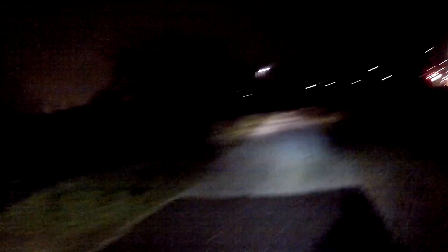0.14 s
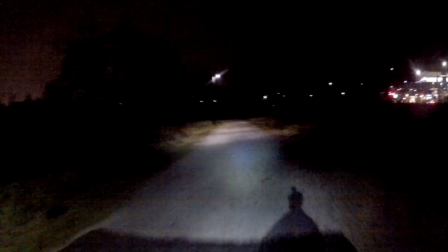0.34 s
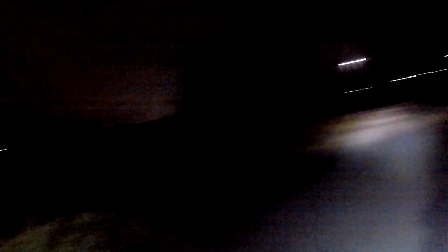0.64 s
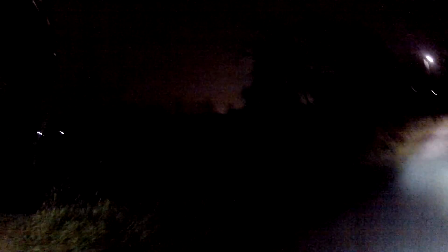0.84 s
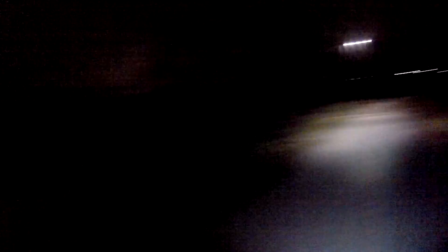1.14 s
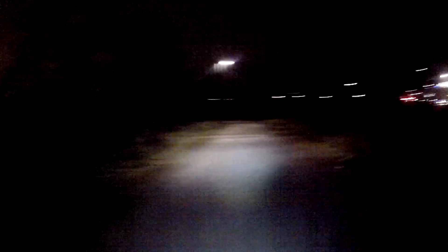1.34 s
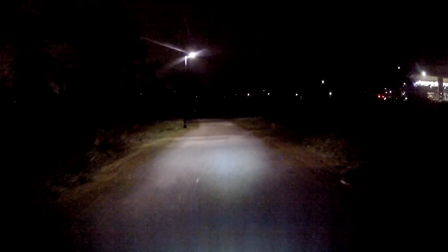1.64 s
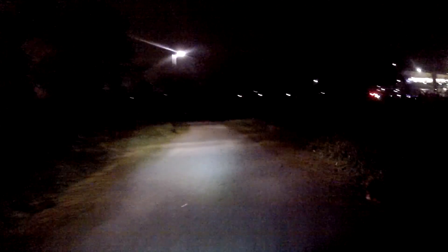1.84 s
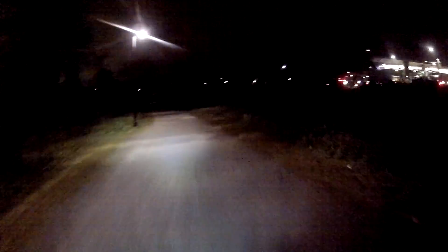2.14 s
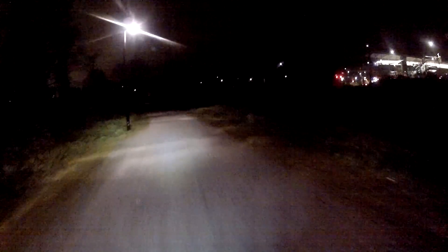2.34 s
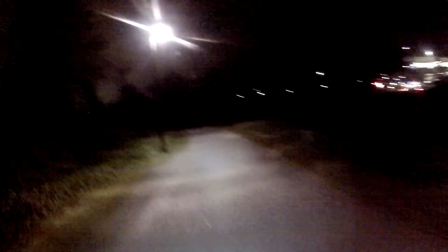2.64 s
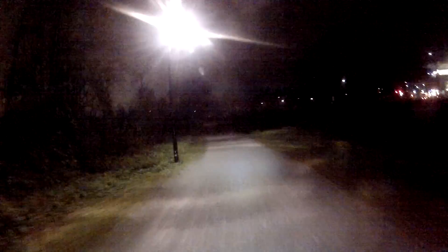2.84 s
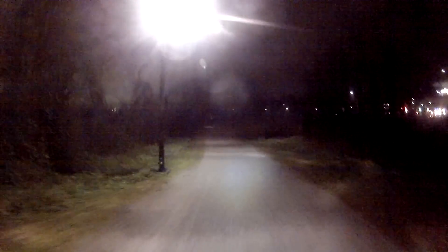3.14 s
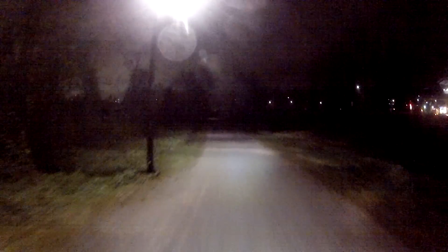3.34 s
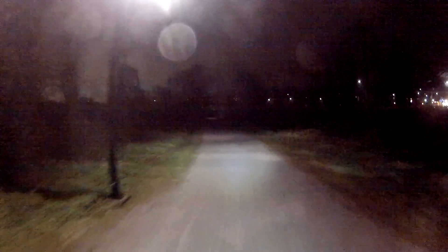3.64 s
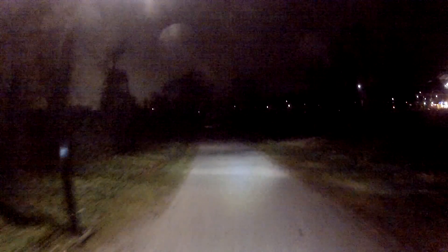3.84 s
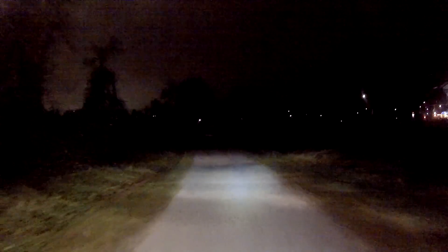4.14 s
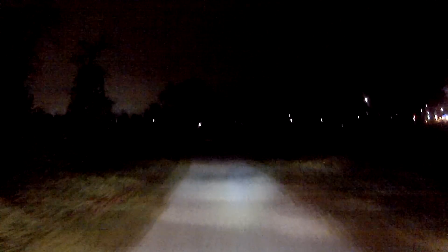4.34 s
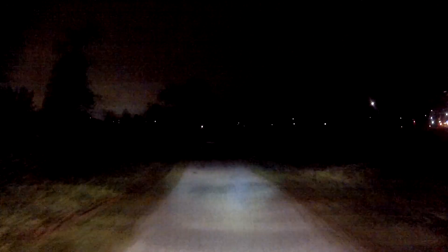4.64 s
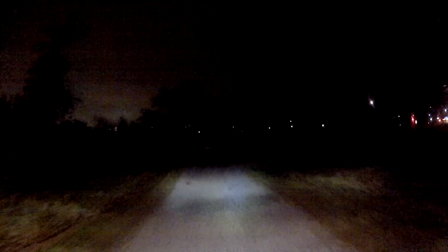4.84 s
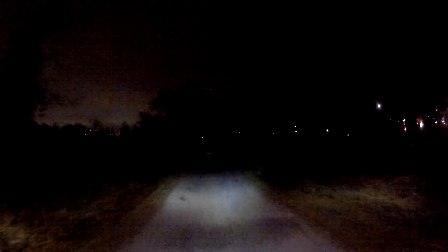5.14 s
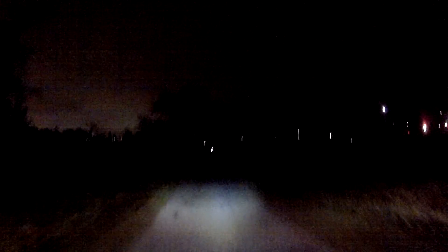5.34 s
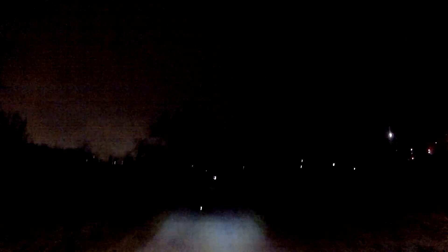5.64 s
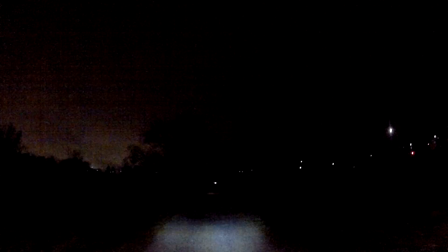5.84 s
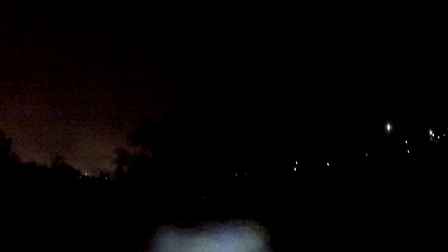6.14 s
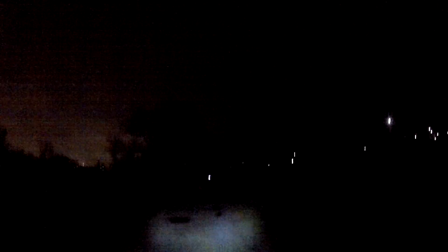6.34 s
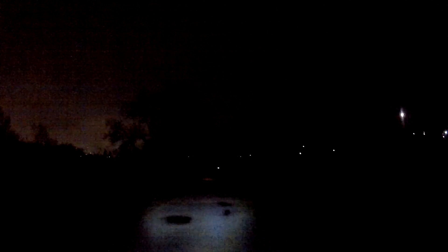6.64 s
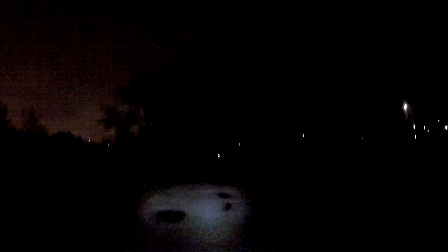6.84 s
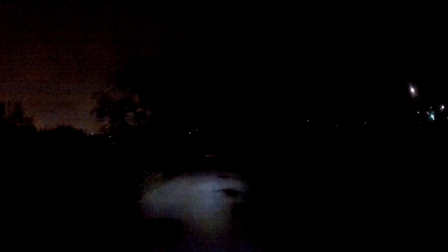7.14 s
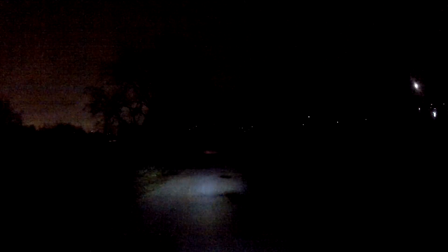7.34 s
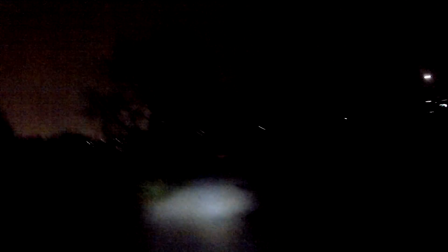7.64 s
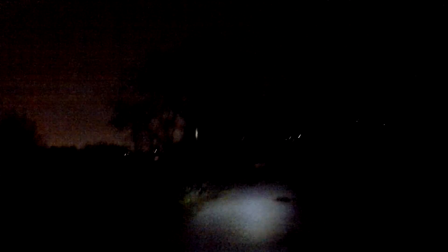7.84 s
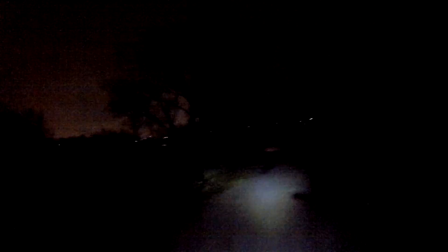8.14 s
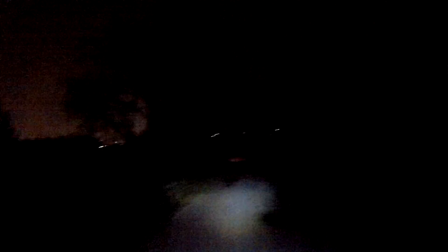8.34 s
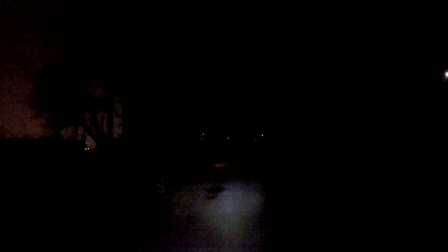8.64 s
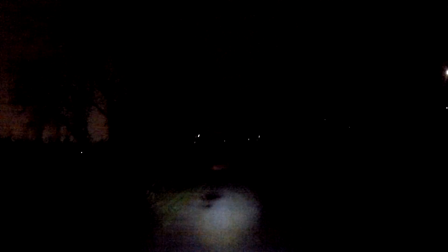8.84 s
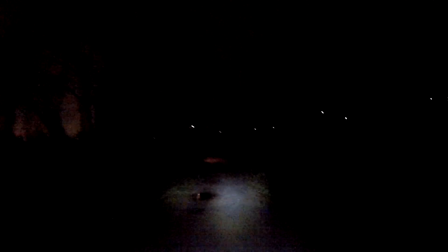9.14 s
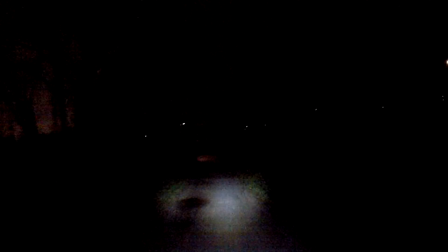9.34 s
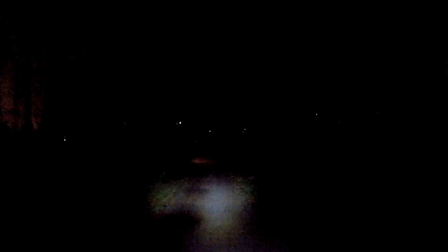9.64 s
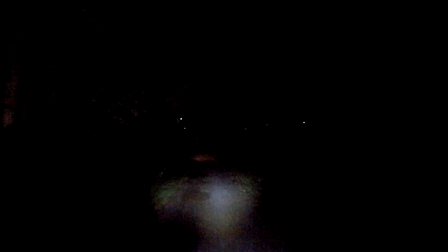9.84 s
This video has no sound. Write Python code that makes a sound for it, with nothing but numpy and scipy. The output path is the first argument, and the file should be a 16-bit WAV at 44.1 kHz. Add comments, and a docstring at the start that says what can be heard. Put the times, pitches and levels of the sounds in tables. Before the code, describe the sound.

Heard from the rider's camera, an electric scooter rolls steadily outdoors on asphalt. Low rumble and rough roar run throughout beneath faint hiss and crackling grit. Gusts brush the microphone at the start, then loose-joint clicks and frame knocks appear, clustering tightly around the middle and again later. Small stones pop dryly under the tyre. The sound is close, narrow and slightly fizzy on top.

```python
"""On a paved path, an electric scooter rolls along, heard from the rider's camera.
Shaped noise makes the tyres' rumble, roar and hiss, the wind, the gusts, a hollow note and a soft whir.
Short dying tones make a loose joint click, the frame ring and stones pop under the tyre.
Rough patches add roar, chatter and second clicks. The camera's low sampling rate adds a thin fizz:
a mirror image of the sound around 12 kHz."""
import sys
import numpy as np
from scipy import signal
from scipy.fft import rfft, irfft, next_fast_len
from scipy.io import wavfile
from scipy.ndimage import map_coordinates

SR = 44100
rng = np.random.default_rng(int(sys.argv[2]) if len(sys.argv) > 2 else 0)


def output_pcm(signal):
    """Save a mono or channel-first signal as 16-bit PCM at the path in sys.argv[1].

    Samples are clipped to [-1, 1] before scaling.
    """
    pcm = np.clip(np.atleast_2d(signal).T, -1, 1) * 32767
    wavfile.write(sys.argv[1], SR, np.round(pcm).astype(np.int16))


N = 440559
TIME = np.arange(N) / SR  # seconds

# Loudness of the wheels' rumble over time: t/s, level/dB
RUMBLE_LEVEL = [(0, -32), (.6, -32), (1.1, -30), (1.85, -37), (2.3, -33), (2.7, -34.5), (3.2, -28.5),
                (3.45, -33), (3.8, -31), (4.05, -32), (4.4, -30.5), (5.7, -30), (5.87, -34), (6.1, -31),
                (6.6, -29.5), (7.65, -33), (8.4, -30), (9.99, -32)]
# Coarseness of the asphalt, which drives roar, hiss, grit, ticks and small stones: t/s, level/dB
COARSENESS = [(0, -4.5), (.5, -9), (.75, -5), (.82, -2.5), (1.35, -2), (1.8, 0), (2.45, -2.5), (3.7, -.5),
              (4.3, 0), (5.4, .5), (5.9, 4.5), (7.2, .5), (7.58, 1), (7.97, -2.5), (8.7, -1.5), (9.1, 1),
              (9.6, 0.5), (9.99, 0)]
# Loudness of the wind buffeting the microphone: t/s, level/dB
WIND_LEVEL = [(0, -38.5), (1.0, -37), (1.8, -43.5), (3.4, -39), (4.7, -37), (6.3, -36.5), (7.4, -39.5),
              (8.1, -35), (9.4, -42)]

# Gusts over the camera: t/s, length/s, level/dB
GUSTS = [(.05, 0.57, -33), (.8, 0.28, -32), (1.17, 0.28, -34.5)]
# Moments when the air draws a hollow note: t/s, length/s, level/dB
HOLLOW_NOTES = [(.1, 0.19, -36.5), (8.16, 0.18, -42)]
# A soft, narrow whir that comes and goes: t/s, length/s, level/dB before its flutter
WHIRS = [(.1, 0.27, -62), (.45, 0.28, -57.5), (1.46, 0.099, -55), (1.77, 0.16, -51), (2.06, 0.18, -59),
         (2.8, 0.1, -57.5), (3.05, 0.46, -58), (3.6, 0.37, -54.5), (3.97, 0.18, -55.5), (4.35, 0.25, -54.5),
         (9.3, .2, -61), (9.75, .3, -62)]
# Light rubbing, as of a tyre on the mudguard: t/s, length/s, level/dB
RUBS = [(.81, 0.043, -51), (.97, 0.37, -53), (1.15, 0.037, -52.5), (5.85, .06, -52), (7.6, 0.044, -46)]
# Rough patches that shake the whole frame: t/s, length/s, shaking level/dB
BUMPS = [(1.835, 0.063, -42.5), (4.90, 0.093, -40), (5.06, 0.059, -42), (5.64, 0.064, -46),
         (5.86, .07, -43), (6.837, 0.095, -47.5), (7.43, 0.056, -44.5), (7.848, 0.077, -39),
         (9.553, 0.11, -46)]

# Harder strikes of the loose joint and the frame's knocks:
# t/s, click level/dB, frame level/dB (both before the boosts in clicks())
CLICKS = [(.8632, -39.5, -55), (1.7973, -32.5, -42), (1.8123, -35, -34), (1.8525, -33, -38),
          (1.9185, -42, -46.5), (3.4468, -41.5, -52), (3.9566, -40, -43), (3.9948, -40, -36.5),
          (4.4712, -36.5, -38), (4.8133, -43, -45), (4.8449, -31.5, -34.5), (4.8683, -22.5, -32.5),
          (4.9015, -29, -37), (4.9215, -25.5, -37), (4.9918, -33.5, -39), (5.0536, -33.5, -35),
          (5.1464, -44, -43.5), (5.215, -39, -44.5), (5.569, -41, -45), (5.6211, -33, -37.5),
          (5.7419, -40, -45), (5.7947, -38, -41), (5.8232, -43, -45), (5.8528, -30.5, -38),
          (5.8995, -37, -40.5), (6.0958, -34, -40), (6.148, -42, -44), (6.2371, -38.5, -57),
          (6.3395, -34.5, -46), (6.792, -34, -40), (6.8503, -34, -43), (6.8675, -37, -42),
          (6.9205, -43, -51), (7.3961, -39, -39), (7.4195, -23.5, -34), (7.4505, -52, -41),
          (7.4811, -39, -43), (7.6837, -35.5, -41), (7.7867, -28.5, -34), (7.7996, -38, -42),
          (7.8151, -44, -51), (7.8305, -50, -42), (7.8378, -21.5, -27.5), (7.8727, -36, -45),
          (7.8955, -32.5, -35), (7.9753, -34.5, -40), (7.9915, -35.5, -42), (8.3382, -36.5, -41.5),
          (8.4622, -37, -41.5), (8.7835, -38, -42), (9.1005, -37.5, -40), (9.4105, -59, -40.5),
          (9.4838, -36, -43), (9.5209, -44, -42), (9.5445, -33, -39), (9.5612, -33, -53),
          (9.6119, -31.5, -41), (9.845, -49, -38)]
# Larger stones popping under the tyre: t/s, level/dB before the boost in pebbles()
PEBBLES = [(1.4692, -39), (1.9704, -34), (2.0657, -39), (2.1256, -38), (2.1682, -36), (2.2563, -42),
           (3.0028, -34.5), (3.0934, -34), (3.1662, -39), (4.5047, -29), (5.7808, -38), (6.0147, -35),
           (6.0412, -39), (7.1272, -32), (7.3472, -29), (8.0136, -41), (8.3494, -36), (8.5485, -33),
           (8.9101, -41), (9.0733, -29.5), (9.2334, -33), (9.3881, -30.5)]

# Tones of the loose joint when struck: f/Hz, relative level/dB, time to fall 60 dB/s
JOINT_TONES = [(3796, 4.5, 0.017), (3500, -40, 0.0041), (5170, 6.5, 0.0039), (4500, -26, .003)]
# Tones of the frame when knocked: f/Hz, relative level/dB, time to fall 60 dB/s
FRAME_TONES = [(519, -1.5, 0.16), (920, -12.5, 0.017), (1135, -2, 0.075), (1350, 0, 0.031),
               (1920, 5.5, 0.015), (2500, 3, 0.015), (2830, -1, 0.037), (3380, 0, 0.016)]
# Tones of the tyre when a stone pops: f/Hz, relative level/dB, time to fall 60 dB/s
TYRE_TONES = [(1580, 6, 0.0047), (2034, 6, 0.015), (2350, -20, 0.0049), (2620, 0, 0.014)]

# Tone colour of the rumble: f/Hz, relative level/dB
RUMBLE_COLOUR = [(45, -36), (75, -4), (105, -0.5), (190, -2.5), (280, -9), (420, -25.5), (800, -70),
                 (2000, -100)]
# Tone colour of the roar: f/Hz, relative level/dB
ROAR_COLOUR = [(80, -38), (200, -1), (290, -0.5), (380, -0.5), (490, 0.5), (590, -5.5), (700, -14),
               (830, -22.5), (1200, -28), (3000, -87)]
# Tone colour of the tread's hiss: f/Hz, relative level/dB
HISS_COLOUR = [(300, -23), (800, -2.5), (1100, 0.5), (1400, 3.5), (1750, 0), (2030, 5), (2350, 2.5),
               (2800, 4), (3450, 0), (3850, -2), (4200, -5), (5300, -10.5)]
# Tone colour of the crackling grit: f/Hz, relative level/dB
GRIT_COLOUR = [(600, 0), (1100, -22), (1700, 3.5), (2020, 12), (2350, 5), (2800, 7), (3450, 3.5), (3850, 5),
               (4300, 1.5), (5500, -10)]
# Tone colour of the buffeting wind: f/Hz, relative level/dB
WIND_COLOUR = [(12, -16), (22, -9), (42, 5), (65, 5.5), (90, 2.5), (200, -43.5)]
# Tone colour of the rushing gusts: f/Hz, relative level/dB
GUST_COLOUR = [(60, -26), (250, 7.5), (560, 1.5), (700, -2.5), (850, -13), (1100, -18.5), (1700, -32),
               (5000, -58)]
# Tone colour of the hollow note: f/Hz, relative level/dB
HOLLOW_COLOUR = [(350, -35), (500, -8), (555, 7.5), (610, -9), (740, -14), (1000, -49)]
# Tone colour of the whir: f/Hz, relative level/dB
WHIR_COLOUR = [(900, -40), (1220, -9), (1330, 4), (1430, -4.5), (1560, -2), (1680, -14), (2400, -47)]
# Tone colour of the rubbing: f/Hz, relative level/dB
RUB_COLOUR = [(1200, -32), (2200, -3), (3800, 1), (4400, -13), (7000, -8)]
# Tone colour of the frame's buzzing and chattering panels: f/Hz, relative level/dB
PANEL_COLOUR = [(150, 2), (480, 2), (750, -3), (960, 10), (1160, 7), (1270, -3), (1420, 2.5), (1650, -2),
                (2000, -2), (2800, -7.5), (4000, -20), (5500, -15.5)]

# Levels where the coarseness is 0 dB
ROAR_DB, HISS_DB, GRIT_DB, TICK_DB, SMALL_STONES_DB = -36.5, -54.5, -57, -68.5, -59.5
ROAR_GROWS = 0.77  # dB of roar per dB of coarseness
ROAR_WAVER_DB = 0.86  # quick random swing of the roar
JOLT_ROAR_DB, JOLT_CHATTER_DB = 7, -2  # relative to a bump's shaking
FRAME_LAG_S, BUZZ_T60_S = 0.001516, 0.058  # the frame answers just after the joint; its panels buzz on
# The joint's second strike on a bump: delay, then levels relative to the shaking
REBOUND_S, REBOUND_CLICK_DB, REBOUND_FRAME_DB = 0.0165, 4, -0.5
HOLD_HZ, EDGE_HZ, TOP_HZ = 12000, 5450, 15400  # camera's sampling rate, its input limit, its output limit
BLOW_TIME = np.arange(SR // 8) / SR  # seconds since a blow


def amp(db):
    """Turn decibels into gain."""
    return 10 ** (np.asarray(db) / 20)


def unit(x):
    """Scale a sound to an average (rms) strength of 1."""
    return x / np.sqrt(np.mean(x ** 2) + 1e-20)


def curve(rows):
    """Join (time, value) points with straight lines, one value per sample."""
    times, values = np.transpose(rows)
    return np.interp(TIME, times, values)


def swells(rows):
    """Add up bell-shaped rises and falls of gain from (time, length, dB) rows."""
    return sum(amp(db) * np.exp(-2 * ((TIME - s) / length) ** 2) for s, length, db in rows)


def wobble(rate):
    """Draw a smooth random curve through rate random points a second."""
    points = rng.standard_normal(int(N * rate / SR) + 4)
    return map_coordinates(points, [TIME * rate])


def filtered(x, response):
    """Strengthen or weaken each frequency by the gain that response gives for it."""
    size = next_fast_len(N + SR // 2)
    gain = response(np.fft.rfftfreq(size, 1 / SR))
    return irfft(rfft(x, size) * gain, size)[:N]


def coloured(x, colour):
    """Give a sound a tone colour from (Hz, dB) points, at rms 1."""
    f, db = np.transpose(colour)
    return unit(filtered(x, lambda hz: amp(np.interp(np.log(hz + 1), np.log(f), db))))


def noise():
    """Make fresh white noise: all frequencies equally strong."""
    return rng.standard_normal(N)


def taps(rate, spread_db):
    """Scatter about rate single-sample taps a second, of uneven size and sign, at rms 1."""
    hits = rng.random(N) < rate / SR
    sizes = amp(spread_db * np.clip(noise(), -2, 2))
    return unit(hits * np.sign(noise()) * sizes)


def ring(tones, scatter_db):
    """Strike an object once: its tones die away, each with a random strength and phase; energy 1."""
    hz, db, t60 = np.transpose(tones)[:, :, None]
    strength, phase = rng.standard_normal((2, len(tones), 1))
    fading = amp(db + scatter_db * strength - 60 * BLOW_TIME / t60)
    sound = np.sum(fading * np.sin(2 * np.pi * (hz * BLOW_TIME + phase)), axis=0)
    return sound / np.linalg.norm(sound)


def patter(tones, rate, spread_db):
    """Repeat one ringing blow at random, about rate times a second, near rms 1."""
    return signal.fftconvolve(taps(rate, spread_db), ring(tones, scatter_db=3.5))[:N]


def burst(t60):
    """Make a short dying scrape of noise; energy 1."""
    sound = rng.standard_normal(len(BLOW_TIME)) * amp(-60 * BLOW_TIME / t60)
    return sound / np.linalg.norm(sound)


def add(track, s, sound):
    """Mix a sound into a track at time s."""
    part = track[max(round(s * SR), 0):][:len(sound)]
    part += sound[:len(part)]


def rumble():
    """The rolling wheels make a low rumble: deep noise that rises and falls."""
    return amp(curve(RUMBLE_LEVEL)) * coloured(noise(), RUMBLE_COLOUR)


def roar():
    """Coarser asphalt makes the tyres roar louder, and bumps add more roar."""
    rolling = amp(ROAR_DB + ROAR_GROWS * curve(COARSENESS) + ROAR_WAVER_DB * wobble(25))
    jolts = amp(JOLT_ROAR_DB) * swells(BUMPS)
    return np.hypot(rolling, jolts) * coloured(noise(), ROAR_COLOUR)


def hiss_and_grit():
    """The tread hisses and fine grit crackles, both louder on coarse asphalt and swinging together."""
    surface_db = curve(COARSENESS) + 1.2 * wobble(40)
    hiss = amp(HISS_DB + surface_db) * coloured(noise(), HISS_COLOUR)
    crackle = coloured(taps(rate=240, spread_db=4.5), GRIT_COLOUR)
    grit = amp(GRIT_DB + surface_db) * crackle
    return hiss + grit


def wind():
    """Wind thumps on the microphone as very low noise."""
    return amp(curve(WIND_LEVEL)) * coloured(noise(), WIND_COLOUR)


def joint_ticks():
    """Road vibration keeps the loose joint ticking faintly, louder on coarse asphalt."""
    return amp(TICK_DB + curve(COARSENESS)) * patter(JOINT_TONES, rate=18, spread_db=3.5)


def small_stones():
    """Many small stones make the tyre pop lightly, louder on coarse asphalt."""
    return amp(SMALL_STONES_DB + curve(COARSENESS)) * patter(TYRE_TONES, rate=45, spread_db=3.5)


def gusts():
    """Gusts rush over the camera near the start, as swells of noise."""
    return swells(GUSTS) * coloured(noise(), GUST_COLOUR)


def hollow_notes():
    """Twice the air draws a hollow note: noise strongest in a narrow band."""
    return swells(HOLLOW_NOTES) * coloured(noise(), HOLLOW_COLOUR)


def whir():
    """A soft whir comes and goes: narrow noise with a flutter in its loudness."""
    flutter_db = wobble(18)
    return swells(WHIRS) * amp(flutter_db) * coloured(noise(), WHIR_COLOUR)


def rubbing():
    """Light rubbing, as of a tyre on the mudguard, gives short swells of high noise."""
    return swells(RUBS) * coloured(noise(), RUB_COLOUR)


def strikes():
    """List (time, click gain, frame gain): a bump throws the joint back to strike again, as hard as it shakes."""
    rows = [(s, amp(click_db), amp(frame_db)) for s, click_db, frame_db in CLICKS]
    times = np.transpose(CLICKS)[0]
    shaking = np.interp(times, TIME, swells(BUMPS))
    for s, jolt in zip(times, shaking):
        rows.append((s + REBOUND_S, jolt * amp(REBOUND_CLICK_DB), jolt * amp(REBOUND_FRAME_DB)))
    return rows


def clicks():
    """The joint snaps shut with a brief scrape; a moment later the frame rings and its panels buzz."""
    track, buzz = np.zeros(N), np.zeros(N)
    buzz_fade = amp(-60 * BLOW_TIME / BUZZ_T60_S)
    for s, click, knock in strikes():
        joint = ring(JOINT_TONES, scatter_db=1.5)
        frame = ring(FRAME_TONES, scatter_db=2)
        snap = joint + 0.5 * burst(t60=0.009)
        # the boosts make up for spreading each blow's energy over many samples
        add(track, s, click * amp(16.0) * snap)
        add(track, s + FRAME_LAG_S, knock * amp(22.0) * frame)
        add(buzz, s + FRAME_LAG_S, knock * amp(0.4) * buzz_fade)
    return track + buzz * coloured(noise(), PANEL_COLOUR)


def pebbles():
    """Each larger stone gives the tyre a short dry pop of quickly dying tones."""
    track = np.zeros(N)
    for s, db in PEBBLES:
        pop = ring(TYRE_TONES, scatter_db=2)
        add(track, s + 0.0005, amp(db + 15.5) * pop)
    return track


def frame_chatter():
    """Rough patches set the frame chattering: a dense run of random taps."""
    chatter = coloured(taps(rate=900, spread_db=5.0), PANEL_COLOUR)
    return amp(JOLT_CHATTER_DB) * swells(BUMPS) * chatter


def scene():
    """Add up everything that reaches the microphone."""
    steady = rumble() + roar() + hiss_and_grit() + wind() + joint_ticks() + small_stones()
    passing = gusts() + hollow_notes() + whir() + rubbing()
    knocks = clicks() + pebbles() + frame_chatter()
    return (steady + passing + knocks)[None]


def record(dry):
    """The camera samples at 12 kHz and holds each value, so the sound returns mirrored around 12 kHz."""
    narrow = filtered(dry[0], lambda hz: (1 + (hz / EDGE_HZ) ** 48) ** -0.5)
    # multiplying by this wave keeps the sound and adds its mirror image
    sampled = narrow * (1 + 2 * np.cos(2 * np.pi * HOLD_HZ * TIME))
    # holding each value softens the treble
    return filtered(sampled, lambda hz: np.sinc(hz / HOLD_HZ) * (hz < TOP_HZ))[None]


dry = scene()
out = record(dry)
output_pcm(out)
```